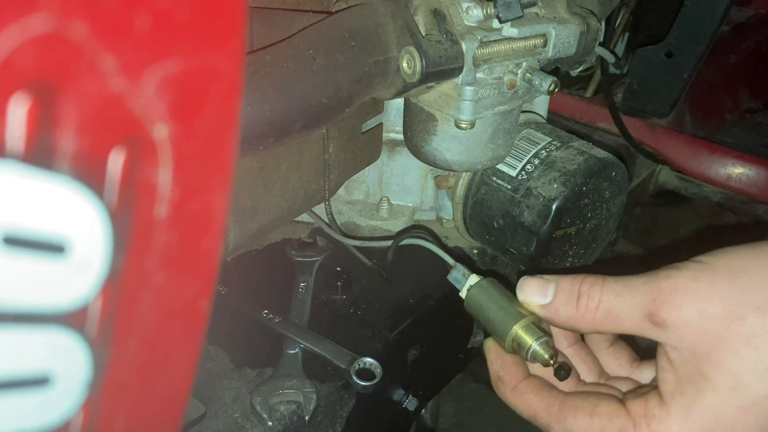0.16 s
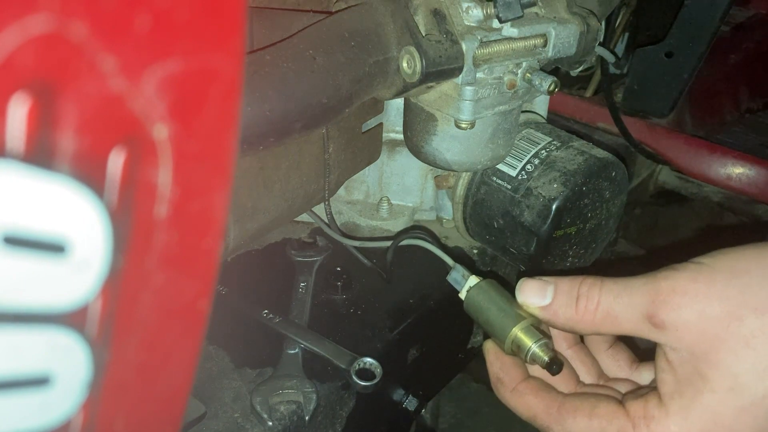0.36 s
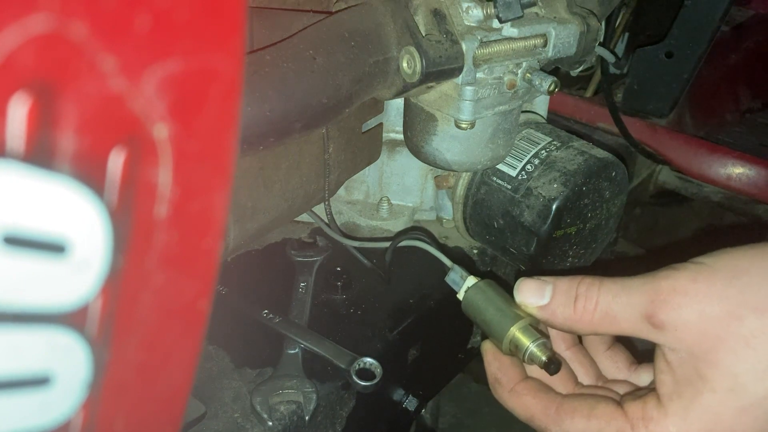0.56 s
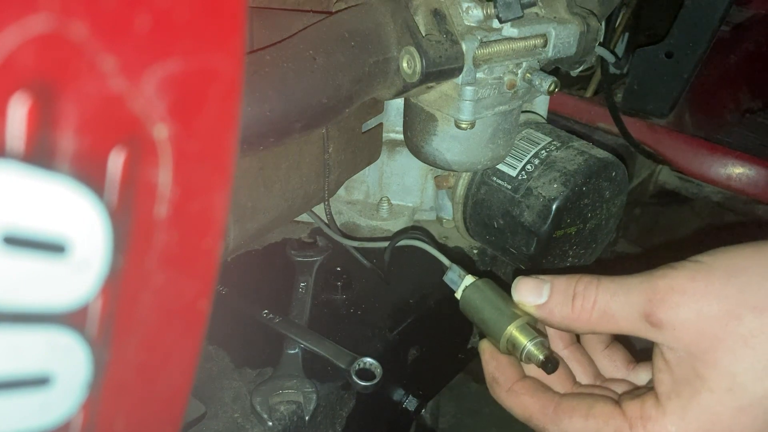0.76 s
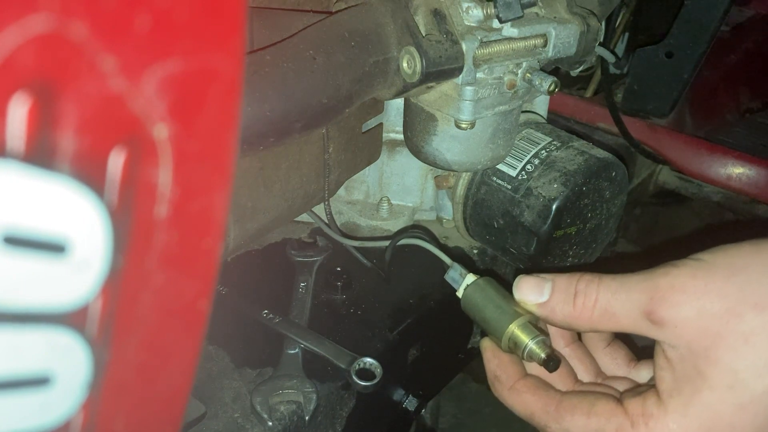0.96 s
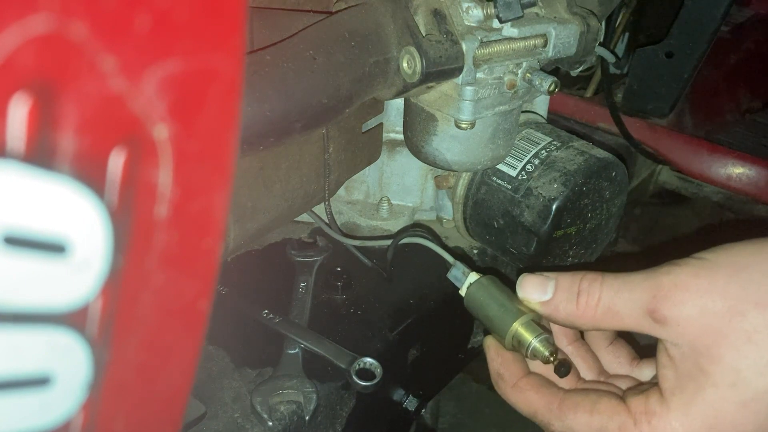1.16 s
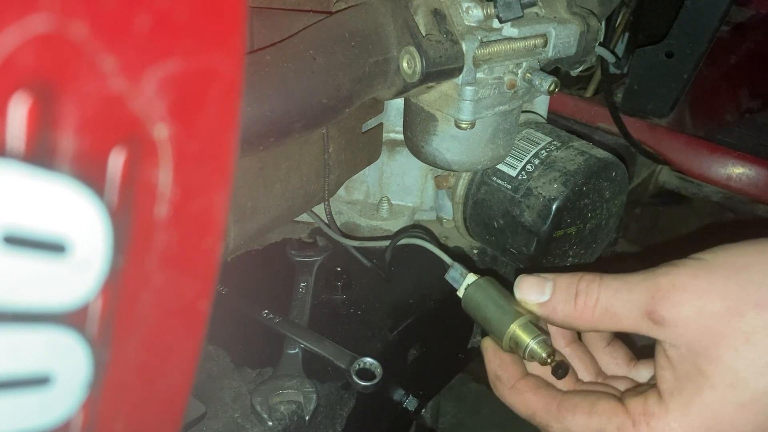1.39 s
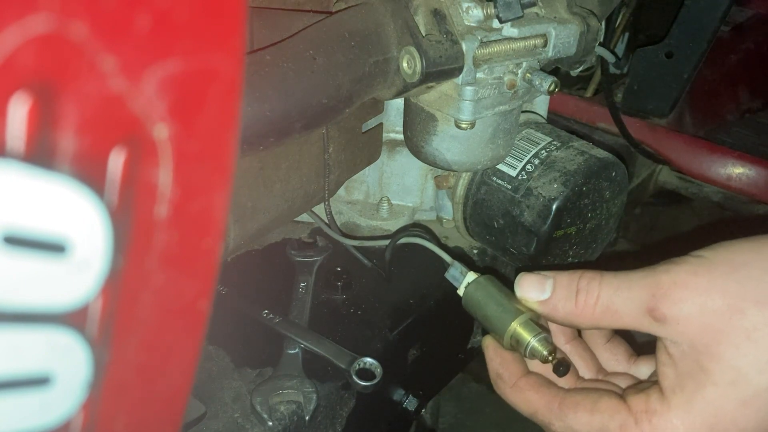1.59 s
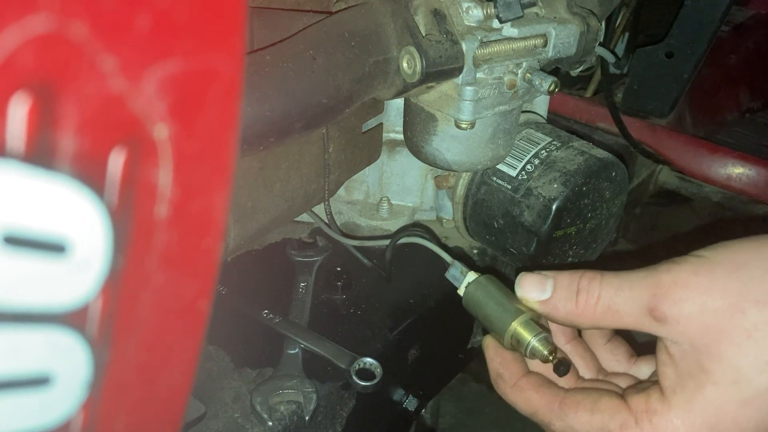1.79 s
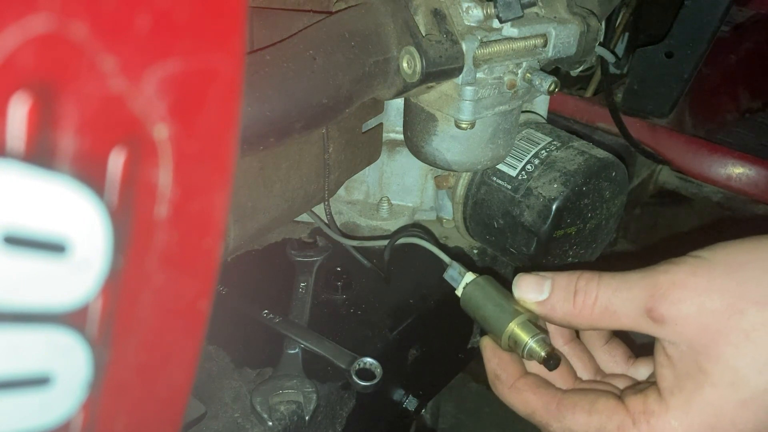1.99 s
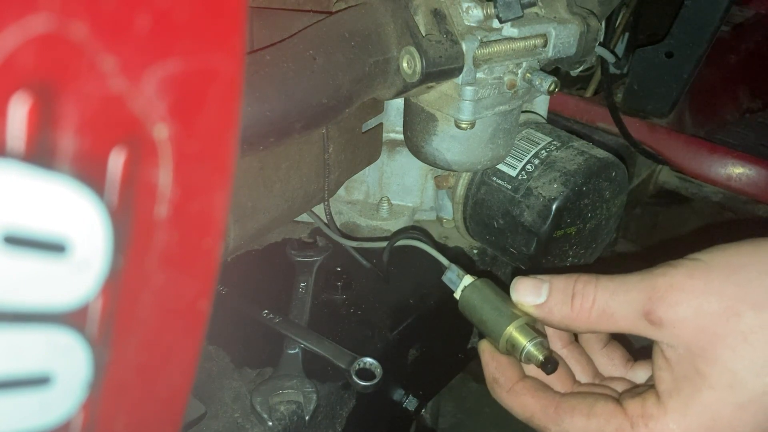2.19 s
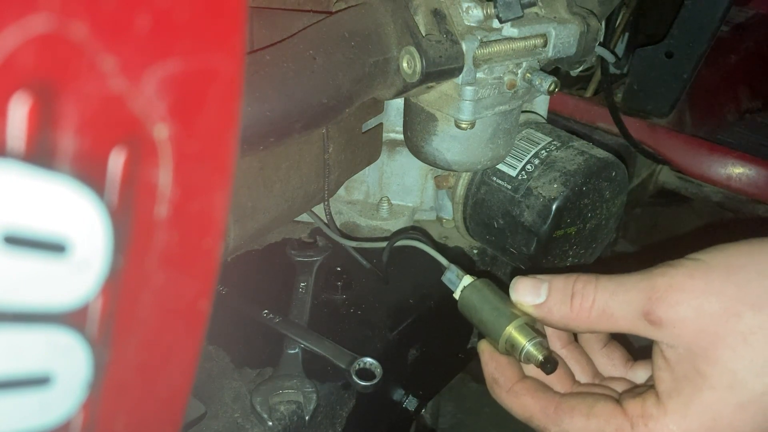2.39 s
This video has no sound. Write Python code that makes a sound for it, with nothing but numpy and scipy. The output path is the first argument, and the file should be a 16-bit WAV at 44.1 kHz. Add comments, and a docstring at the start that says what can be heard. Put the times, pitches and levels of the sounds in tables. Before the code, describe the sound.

Close stereo pickup of a solenoid plunger snapping: two clacks early, a softer group mid-way, two more near the end, with short garage reflections, faint hand ticks and a quiet low motor hum behind.

```python
"""A small engine's fuel solenoid, held in the hand, is switched on and off in a garage.
Seven clacks mix noise clatter with the dying sines of the machine's body, filtered to each blow's band levels.
The plunger adds short metallic pings (dying sines) and hard snaps (noise cracks); the hand adds ticks and rustles.
The room answers with reflections, a noise tail and low booms, over a motor's wavering hum and quiet air."""
import sys
import numpy as np
from scipy import signal
from scipy.fft import rfft, irfft
from scipy.io import wavfile

SR = 44100
rng = np.random.default_rng(int(sys.argv[2]) if len(sys.argv) > 2 else 0)


def wrap_up_sound(samples):
    """Save the sound to the file named by the first command line argument, as 16-bit audio."""
    columns = np.atleast_2d(samples).T
    # keep every value between -1 and 1, then stretch to whole-number steps
    tamed = np.clip(columns, -1, 1)
    steps = np.round(tamed * 32767).astype(np.int16)
    wavfile.write(sys.argv[1], SR, steps)


N = 108045
T = np.arange(SR // 3) / SR  # time axis of one struck sound [s]


def amp(db):
    """Decibels to gain."""
    return 10 ** (np.asarray(db) / 20)


def read(points, hz):
    """A table's value, interpolated on a log-frequency axis."""
    f, value = np.transpose(points)
    return np.interp(np.log(hz + 1), np.log(f + 1), value)


def evened(x):
    """Scales to rms 1."""
    return x / np.sqrt(np.mean(x ** 2) + 1e-20)


def rise(t, rise_s):
    """An exponential onset with time constant rise_s."""
    return 1 - np.exp(-t / rise_s)


def fade(t, t60_s):
    """An exponential decay of 60 dB in t60_s."""
    return np.exp(-np.log(1000) * t / t60_s)


def add(mix, start_s, sound):
    """Mixes a sound in at start_s, cut at the end of the mix."""
    part = mix[:, round(start_s * SR):][:, :sound.shape[-1]]
    part += sound[..., :part.shape[1]]


def noise(colour, size, alike):
    """Two channels of coloured noise at rms 1, with correlation alike."""
    a, b = rng.standard_normal((2, size))
    c = np.clip(alike, -1, 1)
    spectra = rfft([a, c * a + np.sqrt(1 - c * c) * b])
    return evened(irfft(spectra * amp(read(colour, np.fft.rfftfreq(size, 1 / SR))), size))


def ring(modes):
    """A struck part's modes: dying sines of alternating sign."""
    out = 0
    for k, (hz, db, t60_s) in enumerate(modes):
        out = out + (-1) ** k * amp(db) * fade(T, t60_s) * np.sin(2 * np.pi * hz * T)
    return out


def voiced(x, band_db, passes=3):
    """A smooth causal (minimum-phase) filter, re-applied to bring each band of a blow towards its level."""
    # band edges [Hz]
    edges_hz = [150, 240, 350, 560, 900, 1300, 2400, 5500, 16000]
    bands = list(zip(edges_hz, edges_hz[1:]))
    centres_hz = [np.sqrt(lo * hi) for lo, hi in bands]
    z, hz = np.fft.fft(x), abs(np.fft.fftfreq(len(T), 1 / SR))
    for _ in range(passes):
        powers = [np.sum(abs(z[:, (hz >= lo) & (hz < hi)]) ** 2) / z.size / len(T) for lo, hi in bands]
        missing_db = np.array(band_db) - 10 * np.log10(powers)
        gain = amp(read(list(zip(centres_hz, missing_db)), hz))
        z = z * np.exp(np.conj(signal.hilbert(np.log(gain))))  # log gain plus its minimum phase
    return np.fft.ifft(z).real


def clacks(level_db=-11.5):
    """Each blow excites a burst of metal clatter and the body's modes, coloured anew."""
    # blows: (time [s], then level in each of 8 bands [dB rms before level_db])
    blows = [(0.2079, -46, -45.5, -37, -41, -42, -40.5, -40, -38),
             (0.3268, -37, -35.5, -42.5, -45, -47.5, -51.5, -58, -52),
             (1.0294, -49.5, -48, -44, -57, -59, -58.5, -68.5, -70.5),
             (1.1567, -40, -36, -35, -45.5, -45.5, -40.5, -41, -46.5),
             (1.379, -61, -50.5, -53.5, -62.5, -60, -55.5, -67.5, -90.5),
             (1.866, -43.5, -45.5, -48.5, -38.5, -46, -41.5, -46.5, -46.5),
             (2.1163, -43, -41, -34, -47, -54, -54, -57.5, -58.5)]
    # body modes: (frequency [Hz], relative level [dB], t60 [s])
    body_modes = [(165, -17, 0.17), (191.5, -3, .2), (224.7, -7.5, 0.31), (263.2, -8.5, 0.24),
                  (326, -7.5, 0.083), (409.5, 2, 0.13), (511, 1, 0.059), (636, -4.5, 0.029),
                  (782, -5.5, 0.027), (1090, -9.5, 0.03), (1543.6, -3.5, 0.063), (1652, -11, 0.061),
                  (1910, -7, .04), (2855, -11, .04)]
    # dense clatter of the metal parts: (frequency [Hz], relative density [dB per Hz])
    clatter_colour = [(80, -26), (180, -5), (450, -5.5), (1000, -9.5), (2000, 9), (2450, -1), (3400, 1.5),
                      (5500, -10), (7200, -5), (8800, -10.5), (10700, -7.5), (13300, -15), (15500, -22.5)]
    body_rise_s = 0.0005
    clatter_db, clatter_rise_s, clatter_t60_s = 13.5, .0025, .029
    out = np.zeros((2, N))
    for s, *band_db in blows:
        clatter = noise(clatter_colour, len(T), alike=.88)
        clatter = clatter * rise(T, clatter_rise_s) * fade(T, clatter_t60_s)
        body = ring(body_modes) * rise(T, body_rise_s)
        add(out, s, amp(level_db) * voiced(body + amp(clatter_db) * clatter, band_db))
    return out


def pings(left_db=0.5, rise_s=0.0006):
    """The plunger knocks on its sleeve, whose modes ring very briefly."""
    # knocks: (time [s], level [dB])
    knocks = [(1.0644, -29), (1.0672, -23), (1.9379, -17.5), (1.9379, -27.5), (1.9412, -26.5)]
    # sleeve modes: (frequency [Hz], relative level [dB], t60 [s])
    sleeve_modes = [(2170, -12.5, 0.0086), (2988, -9, 0.017), (3530, -2, 0.0037), (4000, 0.5, 0.003)]
    out = np.zeros((2, N))
    for s, db in knocks:
        add(out, s, amp([[db + left_db], [db - left_db]]) * ring(sleeve_modes) * rise(T, rise_s))
    return out


def snaps():
    """The plunger hits its stop: a hard noise crack with a bright decaying ring of noise."""
    # hits: (time [s], level [dB])
    hits = [(0.2218, -16), (1.066, -48.5), (1.0748, -56.5), (1.9384, -42), (1.9453, -22.5)]
    # (frequency [Hz], relative density [dB per Hz])
    snap_colour = [(300, 8), (1500, -15.5), (2400, -28.5), (3200, -4), (4400, -1), (5400, -23), (7000, -4),
                   (8500, 6.5), (10000, 1), (12500, 2.5), (14000, -7), (16000, -14.5)]
    crack_s, ring_db, ring_t60_s = .00035, -14, .03
    shape = np.exp(-(T / crack_s) ** 2 / 2) + amp(ring_db) * fade(T, ring_t60_s)
    out = np.zeros((2, N))
    for s, db in hits:
        add(out, s, amp(db) * shape * noise(snap_colour, len(T), alike=1.0))
    return out


def ticks(skirt_db=-14, rise_s=0.0035, t60_s=.07):
    """Faint handling ticks: brief noise peaked at one frequency."""
    # (time [s], level [dB], centre [Hz])
    touches = [(0.059, -65, 3070), (0.527, -60.5, 2740), (.53, -85, 6900), (0.887, -73, 7500),
               (1.091, -56.5, 5200), (1.667, -66.5, 2200)]
    out = np.zeros((2, N))
    for s, db, hz in touches:
        colour = [(hz / 10, skirt_db), (hz, 0), (hz * 2, skirt_db), (hz * 10, 2 * skirt_db)]
        add(out, s, amp(db) * noise(colour, len(T), alike=1.0) * rise(T, rise_s) * fade(T, t60_s))
    return out


def rustles(rise_s=0.0083, t60_s=.35):
    """The hand shifts against the machine: dull decaying noise."""
    # (time [s], level [dB])
    shifts = [(0, -59.5), (.86, -64), (1.682, -60), (1.752, -67.5)]
    # (frequency [Hz], relative density [dB per Hz])
    rustle_colour = [(80, -24.5), (200, 7.5), (330, 3.5), (700, -6), (1500, -21.5), (4000, -28.5),
                     (12000, -47)]
    out = np.zeros((2, N))
    for s, db in shifts:
        add(out, s, amp(db) * noise(rustle_colour, len(T), alike=1.0) * rise(T, rise_s) * fade(T, t60_s))
    return out


def garage(x):
    """Close reflections off the machine, then the room's tail, each band dying at its own speed."""
    # decay: (frequency [Hz], t60 [s])
    room_t60 = [(150, 0.65), (400, 0.41), (1000, 0.35), (3500, .5), (7000, 0.18), (14000, 0.29)]
    # tail: (frequency [Hz], relative level [dB])
    room_colour = [(100, -11), (220, 1.5), (450, -1), (750, 0), (1500, -3), (4000, -10.5), (8000, -5),
                   (14000, -19)]
    # left-right difference in the reflections: (frequency [Hz], gain [dB])
    room_width = [(120, -16.5), (300, -8.5), (700, 0.5), (3500, -1), (7000, -7.5), (16000, -21.5)]
    tail_rise_s, bass_hz, bass_rise_s = 0.004, 700, .03
    early_db, early_rise_s, early_t60_s = -8, 0.0016, 0.081
    t = np.arange(SR) / SR
    hz, at, z = signal.stft(rng.standard_normal((2, SR)), SR, nperseg=256)
    t60_s = read(room_t60, hz)[:, None]
    unit_energy = np.sqrt(2 * np.log(1000) / t60_s / SR)
    z = z * fade(at, t60_s) * amp(read(room_colour, hz))[:, None] * unit_energy
    z = z * (1 - np.exp(-(at / bass_rise_s) ** 2 - (hz[:, None] / bass_hz) ** 4))  # bass builds up slowly
    tail = signal.istft(z, SR, nperseg=256)[1][:, :SR] * (1 - np.exp(-(t / tail_rise_s) ** 2))
    early = noise([(400, -15), (1500, 9.5), (12000, 0)], SR, alike=0)
    early = evened(early * fade(t, early_t60_s) * rise(t, early_rise_s)) / np.sqrt(SR)
    left, right = rfft(signal.fftconvolve(x, tail + amp(early_db) * early, axes=1), 2 * N)
    mid = left + right
    side = (left - right) * amp(read(room_width, np.fft.rfftfreq(2 * N, 1 / SR)))
    return irfft([mid + side, mid - side], 2 * N)[:, :N] / 2


def booms(left_db=1, rise_s=0.012):
    """The room's low resonances swell and die after a jolt."""
    # jolts: (time [s], level [dB])
    jolts = [(0.328, -39), (1.039, -45), (1.16, -43.5), (1.368, -46), (1.933, -41.5), (2.149, -42)]
    # room modes: (frequency [Hz], relative level [dB], t60 [s])
    boom_modes = [(64.2, -0.5, 0.55), (107.4, -7.5, 0.32), (138, -14, 0.9)]
    out = np.zeros((2, N))
    for s, db in jolts:
        add(out, s, amp(db) * rise(T, rise_s) * ring(boom_modes))
    return out * amp([[left_db], [-left_db]])


def drift():
    """A slow random wander of rms 1: straight lines between 20 random points."""
    t = np.arange(N) / SR
    return evened(np.interp(t, np.linspace(0, t[-1], 20), rng.standard_normal(20)))


def motor_hum(waver=0.23, left_db=1):
    """A distant motor's sines; waver is the rms drift of gain (fraction) and of phase [rad]."""
    # (frequency [Hz], level before waver and left_db [dB rms])
    hum_lines = [(59.2, -61.5), (118.4, -60), (177.6, -78.5), (263.8, -82)]
    t = np.arange(N) / SR
    hum = np.zeros(N)
    for hz, db in hum_lines:
        gain = amp(db) * np.sqrt(2) * (1 + waver * drift())
        hum += gain * np.sin(2 * np.pi * (hz * t + rng.random()) + waver * drift())
    return hum * amp([[left_db], [-left_db]])


def room_air(level_db=-62):
    """Quiet room air: steady low-weighted noise."""
    # (frequency [Hz], relative density [dB per Hz])
    air_colour = [(20, -37), (40, -12.5), (62, -5), (86, -9), (125, -7), (160, -17), (260, -21.5),
                  (400, -24), (700, -34.5), (1800, -41), (5000, -48), (11000, -50.5), (16000, -60)]
    return amp(level_db) * noise(air_colour, N, alike=0.35)


def scene(ping_room_db=-14, snap_room_db=-5):
    """The solenoid sits close to the microphones, so the plunger sounds drier than the body."""
    body, ping, snap = clacks() + ticks() + rustles(), pings(), snaps()
    room = garage(body + amp(ping_room_db) * ping + amp(snap_room_db) * snap)
    return body + ping + snap + room + booms() + motor_hum() + room_air()


def record(dry):
    """The two microphone ports' phase and balance, then the band limit."""
    # balance: (frequency [Hz], up on the left and down on the right [dB])
    balance = [(300, 0.6), (700, 1), (2500, 1), (5000, 0)]
    # port phase: (frequency [Hz], lead of the right [rad])
    port_phase = [(300, 0), (1500, .4), (3200, .9), (4400, .5), (5600, 1.7), (7000, .4), (9200, 2.7),
                  (11300, .2), (13600, 2.8), (15600, .6)]
    edge_hz = 16500
    hz, sides = np.fft.rfftfreq(2 * N, 1 / SR), np.array([[1], [-1]])
    ports = amp(read(balance, hz) * sides) * np.exp(-.5j * read(port_phase, hz) * sides)
    heard = irfft(rfft(dry, 2 * N) * ports, 2 * N)[:, :N]
    lowpass = signal.firwin(255, edge_hz, window=("kaiser", 9), fs=SR)
    return signal.oaconvolve(heard, lowpass[None], "same")


dry = scene()
out = record(dry)
wrap_up_sound(out)
```